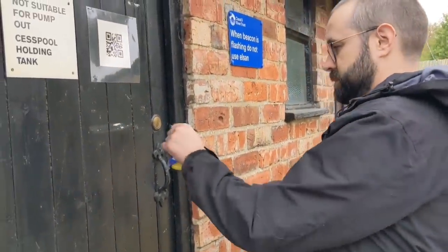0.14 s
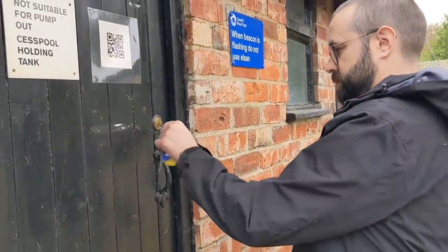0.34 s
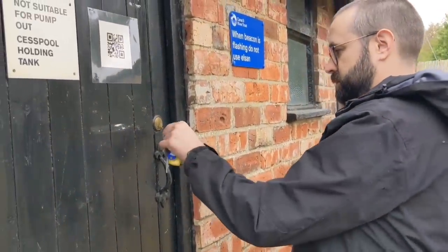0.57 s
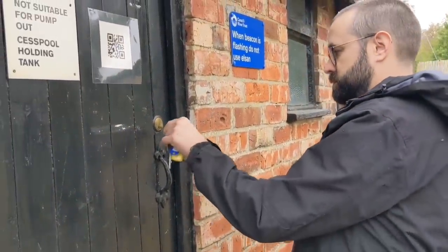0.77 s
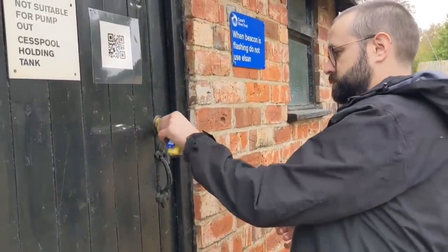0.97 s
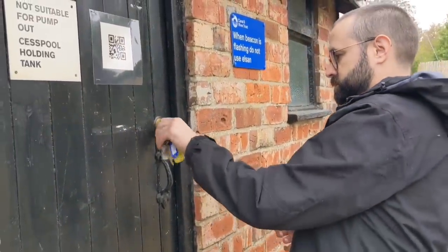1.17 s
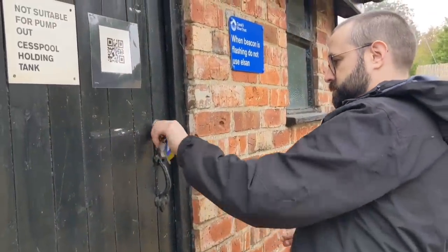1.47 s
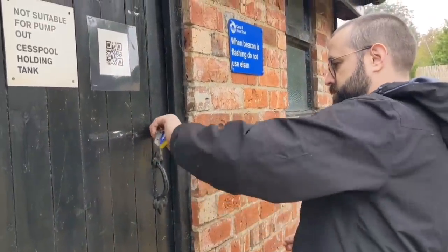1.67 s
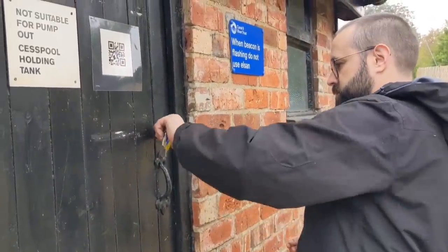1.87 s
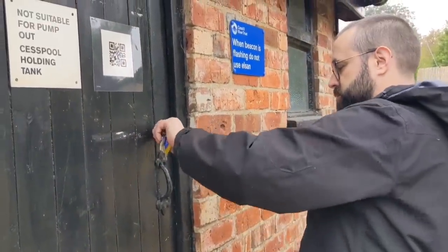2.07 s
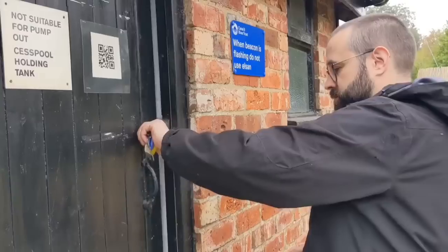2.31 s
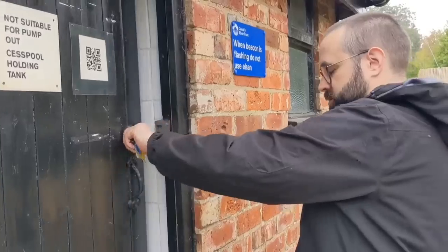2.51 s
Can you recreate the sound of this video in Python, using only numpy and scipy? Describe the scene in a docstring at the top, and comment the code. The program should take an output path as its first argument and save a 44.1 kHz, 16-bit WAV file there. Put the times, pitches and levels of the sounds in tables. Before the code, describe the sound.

A key unlocks a wooden door, close by in faint outdoor air. From about 0.4 seconds it taps and scratches at the lock, scraping in at 1 second. Keys clink and the lock clicks between 1.3 and 1.8 seconds. At 1.9 seconds the door comes free with a heavy, shuddering clunk, the loudest sound. The hinge rubs and squeaks briefly near 2.4 seconds while a sleeve rustles softly.

```python
"""Outdoors at a plank door, a key feels for the lock, scrapes in and turns as other keys clink on their ring.
Impacts and sliding friction excite the resonances of the keys, the lock case and the wood around it.
The door comes free with a heavy clunk of its damped modes, shudders, and swings open with a rub
and one short friction squeak of the hinge. A jacket sleeve rustles over faint outdoor air."""
import sys
import numpy as np
from scipy import signal
from scipy.fft import rfft, irfft, next_fast_len
from scipy.io import wavfile
from scipy.ndimage import uniform_filter1d

SR = 44100
rng = np.random.default_rng(int(sys.argv[2]) if len(sys.argv) > 2 else 0)


def master(y):
    """Save y as 16-bit WAV."""
    cut = np.clip(np.atleast_2d(y).T, -1, 1)
    pcm = np.round(cut * 32767)  # scale
    wavfile.write(sys.argv[1], SR, pcm.astype(np.int16))


N = 116865
T = np.arange(N) / SR

# spectra of bright key metal, the lock case and the wood around it (f/Hz, level/dB)
METAL_SPECTRUM = [(1500, -22), (3300, -3), (8000, -3), (13000, 0), (16000, -6)]
CASE_SPECTRUM = [(400, -23), (1200, -2), (2700, -4), (4700, -15), (12000, -40)]
WOOD_SPECTRUM = [(90, -26), (290, 0), (800, -1), (4000, -45)]
# resonances of the lock case (f/Hz, boost/dB)
CASE_RESONANCES = [(1410, 6), (2300, 7), (3480, 4)]


def lock():
    """Impact excitation: each contact sounds metal, case and wood, with a fast decay and a weak tail."""
    # contacts of key, lock and latch (t/s, metal level/dB, case level/dB, wood level/dB)
    contacts = [(.436, -45, -33, -37), (.528, -51, -40, -48), (.562, -42, -44, -48), (.598, -52, -42, -47),
                (.7445, -62, -35, -48), (.797, -53, -41, -47), (.866, -45, -47, -55),
                (.9825, -31, -43, -54), (1.032, -31, -34, -44), (1.053, -31, -26, -29),
                (1.059, -40, -33, -21), (1.2875, -30, -45, -52), (1.322, -28, -45, -58),
                (1.368, -35, -41, -56), (1.570, -34, -33, -37), (1.5925, -26, -38, -50),
                (1.622, -36, -41, -56), (1.6385, -24, -35, -60), (1.8905, -22, -23, -23),
                (1.897, -37, -25, -19), (1.928, -31, -35, -32)]
    # (spectrum, resonances, attack/s, decay/s, tail level/dB, tail decay/s)
    parts = [(METAL_SPECTRUM, (), .0008, .0018, -15, .009),
             (CASE_SPECTRUM, CASE_RESONANCES, .0006, .003, -16, .022),
             (WOOD_SPECTRUM, (), .0015, .006, -15, .035)]
    age, out = T[:SR // 3], 0
    for part, (spectrum, resonances, attack, decay, tail_db, tail_decay) in enumerate(parts):
        fall = np.exp(-age / decay) + amp(tail_db) * np.exp(-age / tail_decay)
        envelope = (1 - np.exp(-age / attack)) * fall
        power = np.zeros(N)  # incoherent sounds add in power
        for start, *db in contacts:
            add(power, start, (amp(db[part]) * envelope / envelope.max()) ** 2)
        out = out + np.sqrt(power) * noise(spectrum, resonances)
    return out


def door():
    """Modal response: blows ring the planks and sway the door; a longer contact excites less treble."""
    # pushes and blows (t/s, level/dB, Gaussian pulse width/ms, relative sway level/dB)
    blows = [(1.060, -34, .5, -16), (1.110, -33, 1.2, -6), (1.8977, -20, .2, -6), (1.9035, -20, .6, -2),
             (1.916, -10.5, 1.0, 0), (2.068, -27, 1.2, -4)]
    # modes of the door (f/Hz, level/dB, T60/s)
    door_modes = [(79, -6, .46), (124, -1, .44), (167, -4, .33), (214, -3, .34), (319, -5, .22),
                  (405, 2, .17), (546, 1, .16), (687, -7, .14), (1245, 3, .06)]
    sway_below_hz, thud_hz, thud_s = 135, 95, .005
    age, out = T[:SR], np.zeros(N)
    modes = [(hz, amp(db) * damped_mode(age, hz, t60)) for hz, db, t60 in door_modes]
    thud = amp(8) * np.exp(-age / thud_s) * np.cos(2 * np.pi * thud_hz * age)  # the planks give once
    sway = thud + sum(mode for hz, mode in modes if hz < sway_below_hz)
    planks = sum(mode for hz, mode in modes if hz >= sway_below_hz)
    pulse_time = (np.arange(SR // 50) - SR // 100) / SR
    for start, db, width_ms, sway_db in blows:
        force = np.exp(-.5 * (pulse_time * 1000 / width_ms) ** 2)
        response = signal.fftconvolve(planks + amp(sway_db) * sway, force / force.sum())
        add(out, start + pulse_time[0], amp(db) * response)
    return out


def clinks():
    """Free vibration: keys and lock parts ring in their modes; a struck key sets the bunch shimmering."""
    # keys swinging together and lock parts snapping over (t/s, level/dB, part)
    strikes = [(1.3222, -32, "long key"), (1.368, -35, "short key"), (1.456, -42, "long key"),
               (1.639, -29, "spring"), (1.661, -36, "spring"), (1.774, -35, "bolt")]
    # modes of each part (f/Hz, level/dB, T60/s)
    metal_modes = {"long key": [(4694, -11, .04), (8888, 2, .075), (12280, 0, .07), (14540, 0, .025)],
                   "short key": [(5184, -10, .045), (8888, -5, .07), (11420, -1, .045), (14510, 3, .07)],
                   "spring": [(2850, -2, .025), (3480, -4, .03)], "bolt": [(1150, 0, .03)]}
    shimmer_db, shimmer_s = -4, .013
    age, out, shimmer = T[:SR // 3], np.zeros((2, N)), np.zeros(N)
    for start, db, part in strikes:
        for hz, mode_db, t60 in metal_modes[part]:
            offset = rng.random((2, 1)) / hz / 2  # up to half a period in each channel
            add(out, start, amp(db + mode_db) * damped_mode(age + offset, hz, t60))
        if "key" in part:
            add(shimmer, start, amp(db + shimmer_db) * np.exp(-age / shimmer_s))
    return out + shimmer * noise(METAL_SPECTRUM)


def scrape():
    """Sliding friction: the key's teeth grind over lock face and pins, driving blade, case and wood."""
    # the key seeks the slot, slides in and turns (t/s, blade level/dB, body level/dB)
    levels = [(.50, -68, -51), (.87, -66, -52), (.95, -60, -49), (1.003, -38, -44), (1.058, -33, -34),
              (1.10, -56, -46), (1.48, -61, -55), (1.64, -47, -48), (1.86, -66, -55)]
    # resonances of the key's blade (f/Hz, boost/dB)
    blade_resonances = [(9300, 7), (11300, 6), (13800, 9)]
    roughness_db = 2.8
    grain = unit(amp(roughness_db * fluctuation(samples=90)))
    blade = fade(levels, column=1) * noise(METAL_SPECTRUM, blade_resonances)
    body = noise(CASE_SPECTRUM, CASE_RESONANCES) + amp(-4) * noise(WOOD_SPECTRUM)
    return grain * (blade + fade(levels, column=2) * body)


def rasps():
    """Transient friction: the key drags over brass in grainy swells that sound the case and the wood."""
    # short drags (centre t/s, case level/dB, wood level/dB)
    drags = [(.446, -36, -40), (.545, -43, -48), (.775, -40, -43), (1.574, -37, -37), (1.668, -39, -45)]
    swell_s, roughness_db = .010, 2.2
    case, wood = sum(amp(db)[:, None] * np.exp(-np.abs(T - centre) / swell_s) for centre, *db in drags)
    grain = unit(amp(roughness_db * fluctuation(samples=90)))
    return grain * (case * noise(CASE_SPECTRUM, CASE_RESONANCES) + wood * noise(WOOD_SPECTRUM))


def judder():
    """Forced vibration: the loose door rattles, its low resonance shifting with the hand's pressure."""
    # course of the shudder (t/s, resonance f/Hz, level/dB)
    course = [(.395, 180, -62), (.412, 180, -36), (.6, 168, -41), (.74, 130, -43), (.93, 140, -52),
              (1.08, 165, -40), (1.22, 160, -53), (1.5, 160, -55), (1.62, 140, -41), (1.87, 140, -54),
              (1.91, 180, -21.5), (2.3, 125, -52)]
    times, hz, _ = np.array(course).T
    shudder = narrowband(np.interp(T, times, hz), half_width_hz=35)
    rattle = amp(-9) * noise([(270, 0), (900, -32)])  # loose planks (f/Hz, level/dB)
    return fade(course, column=2) * (shudder + rattle)


def hinge():
    """Stick-slip friction: the hinge rubs as the door swings and briefly catches in a rough squeak."""
    # course of the squeak (t/s, fundamental f/Hz, level/dB)
    squeak = [(2.345, 850, -52), (2.370, 775, -30), (2.398, 760, -39), (2.43, 740, -54)]
    # its harmonics, from the fundamental up (level/dB)
    harmonics = [-8, -7, 0, -12, -16, -15, -22, -12, -17, -14]
    # envelope of the rub (t/s, level/dB)
    rub_levels = [(1.93, -43), (2.42, -44), (2.65, -47)]
    # spectrum of the rub (f/Hz, level/dB)
    rub_spectrum = [(80, -14), (180, 0), (330, -9), (760, -3), (1850, -7), (2230, 1), (2700, -10),
                    (8000, -27)]
    times, hz, _ = np.array(squeak).T
    jitter = 1 + .033 * fluctuation(samples=60)
    phase = 2 * np.pi * np.cumsum(np.interp(T, times, hz) * jitter) / SR
    tone = sum(amp(db) * np.sin(k * phase + rng.random((2, 1)) * np.pi / 2)
               for k, db in enumerate(harmonics, start=1))
    rub = fade(rub_levels) * noise(rub_spectrum, treble_correlation=.3)
    return unit(tone) * fade(squeak, column=2) + rub


def chirps():
    """Friction-excited resonance: the door's edge rubs as it slides and whistles faintly as the door swings."""
    # whistles (centre t/s, f/Hz, level/dB)
    whistles = [(2.025, 8000, -56), (2.19, 5300, -54), (2.45, 4300, -51)]
    swell_s = .04
    return sum(amp(db) * np.exp(-((T - centre) / swell_s) ** 2) * narrowband(hz, half_width_hz=110)
               for centre, hz, db in whistles)


def sleeve():
    """Friction noise: the cloth of a sleeve rustles with a slight flutter in level."""
    # envelope of the rustle (t/s, level/dB)
    levels = [(0, -50), (.4, -56), (.55, -62), (2.03, -66), (2.17, -53), (2.65, -47)]
    # spectrum of the cloth (f/Hz, level/dB)
    spectrum = [(500, -8), (2000, 0), (6500, -4), (11000, 1), (16000, -4)]
    flutter = amp(fluctuation(samples=500))
    return fade(levels) * flutter * noise(spectrum, treble_correlation=.1)


def air():
    """Stationary ambient noise: faint outdoor air, strongest in the bass."""
    # spectrum of the air (f/Hz, level/dB)
    spectrum = [(20, -30), (55, -2), (155, -1), (300, -10), (750, -12), (9000, -38)]
    return amp(-52) * noise(spectrum, treble_correlation=.05)


def amp(db):
    """Amplitude ratio of a level in decibels."""
    return 10 ** (np.asarray(db) / 20)


def unit(x):
    """Normalisation to rms 1."""
    return x / np.sqrt(np.mean(x ** 2))


def fluctuation(samples):
    """A moving average smooths white noise into a slower random signal of rms 1."""
    return unit(uniform_filter1d(rng.standard_normal(N), size=samples))


def fade(rows, column=1):
    """Amplitude envelope from a level/dB column over t/s, dying away exponentially beyond its ends."""
    rows = np.array(rows)
    outside = np.maximum(rows[0, 0] - T, 0) + np.maximum(T - rows[-1, 0], 0)
    return amp(np.interp(T, rows[:, 0], rows[:, column])) * np.exp(-outside / .03)


def colour(x, spectrum, resonances=()):
    """Zero-phase filtering by a spectrum (f/Hz, level/dB) with narrow peaks (f/Hz, boost/dB) on top."""
    size, relative_half_width = next_fast_len(N), .028
    hz, db = np.array(spectrum).T
    f = np.maximum(np.fft.rfftfreq(size, 1 / SR), 1)
    peaks = sum(boost / (1 + ((f / centre - 1) / relative_half_width) ** 2)
                for centre, boost in resonances)
    gain = amp(np.interp(np.log(f), np.log(hz), db) + peaks)
    return irfft(rfft(x, size) * gain, size)[..., :N]


def noise(spectrum, resonances=(), treble_correlation=.5):
    """Partial coherence: coloured stereo noise, alike in the bass, differs in the treble by scattering."""
    size, crossover_hz = next_fast_len(N), 1300
    f = np.fft.rfftfreq(size, 1 / SR)
    incoherent = (1 - treble_correlation) * f ** 2 / (f ** 2 + crossover_hz ** 2)
    white = rfft(rng.standard_normal((3, size)))
    pair = irfft(white[0] * np.sqrt(1 - incoherent) + white[1:] * np.sqrt(incoherent), size)
    return unit(colour(pair, spectrum, resonances))


def narrowband(hz, half_width_hz):
    """Quadrature modulation shifts low-pass noise into one resonance whose centre may move."""
    slow = signal.sosfilt(signal.butter(2, half_width_hz, fs=SR, output="sos"), rng.standard_normal((2, N)))
    phase = 2 * np.pi * np.cumsum(hz * np.ones(N)) / SR
    return unit(slow[0] * np.cos(phase) + slow[1] * np.sin(phase))


def damped_mode(age, hz, t60):
    """A damped harmonic oscillator, falling 60 dB in t60 seconds."""
    return np.cos(2 * np.pi * hz * age) * np.exp(-np.log(1000) * age / t60)


def add(out, start, sound):
    """Superpose a sound from a start time in seconds."""
    i = int(start * SR)
    out[..., i:i + sound.shape[-1]] += sound[..., :N - i]


def scene():
    """Linear superposition of key, lock, door, hinge and background."""
    key_and_lock = lock() + clinks() + scrape() + rasps()
    return key_and_lock + door() + judder() + hinge() + chirps() + sleeve() + air()


def record(dry):
    """Level and time differences between two microphones, then clipping and band limiting."""
    # left level minus right level (f/Hz, difference/dB)
    balance = [(400, -1), (1290, 2.5), (2380, 7.5), (4400, 2.5), (8120, 7), (13000, -5)]
    lag_samples, bottom_hz, top_hz = 5, 30, 15800
    left = colour(dry[0], [(hz, db / 2) for hz, db in balance])
    right = colour(dry[1], [(hz, -db / 2) for hz, db in balance])
    pair = np.array([np.pad(left, (lag_samples, 0))[:N], right])
    pair = signal.sosfilt(signal.butter(2, bottom_hz, "high", fs=SR, output="sos"), pair)
    return signal.sosfilt(signal.ellip(10, .2, 80, top_hz, fs=SR, output="sos"), np.clip(pair, -1, 1))


dry = scene()
out = record(dry)
master(out)
```